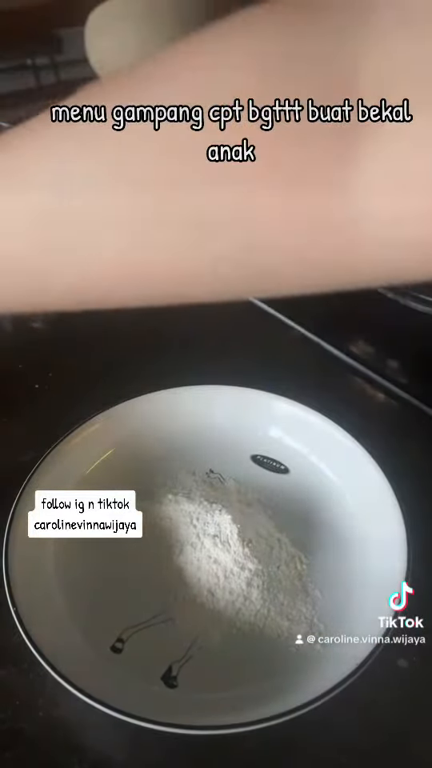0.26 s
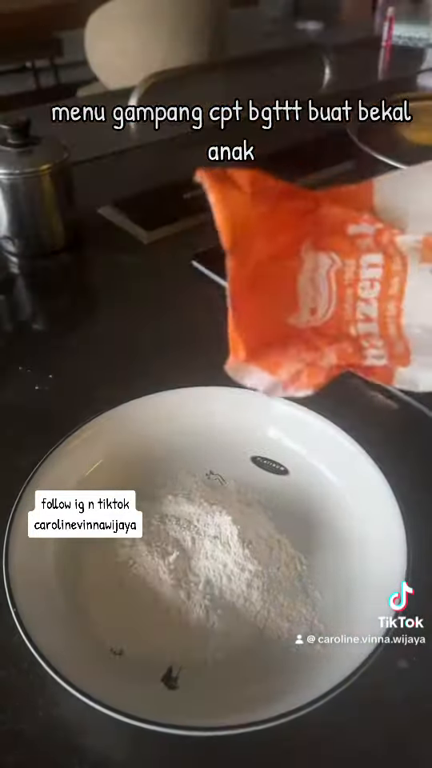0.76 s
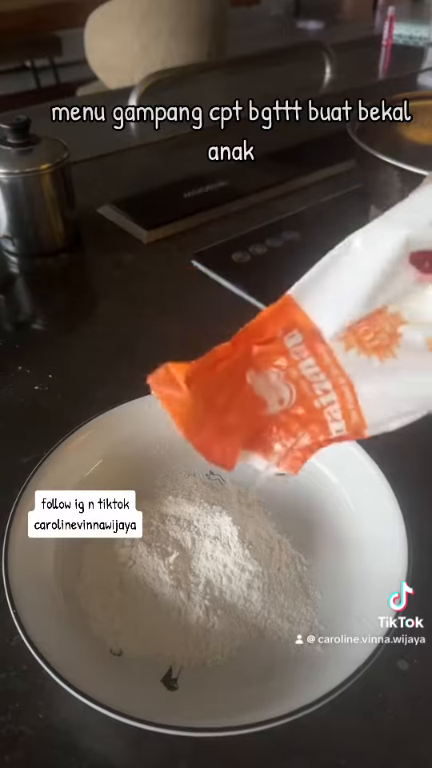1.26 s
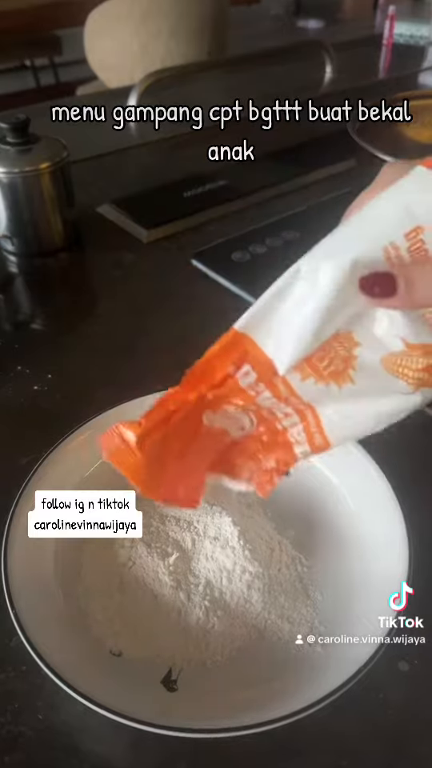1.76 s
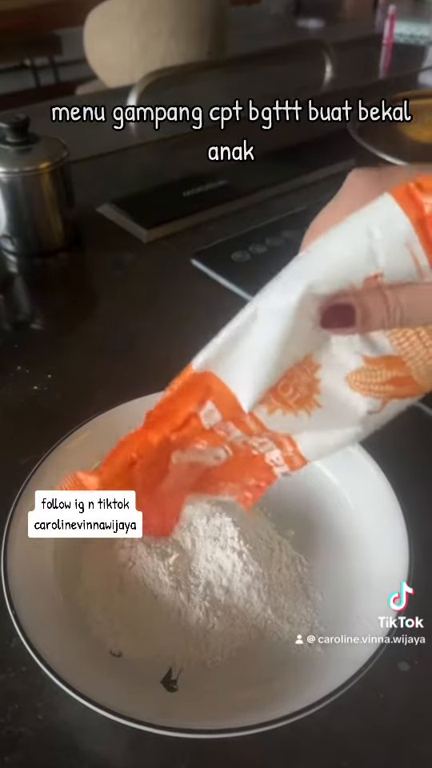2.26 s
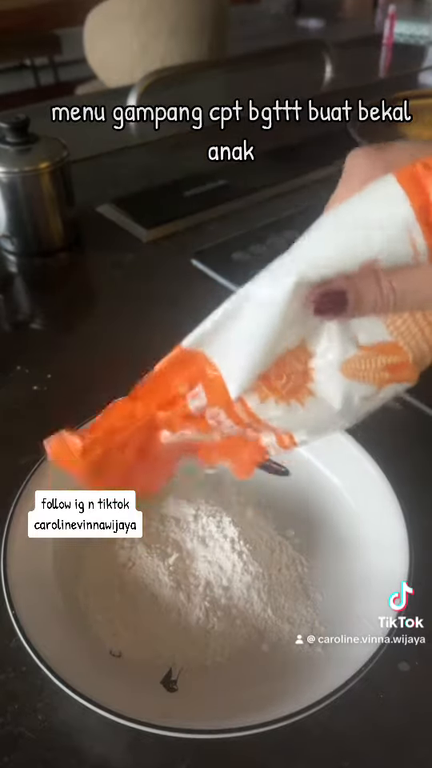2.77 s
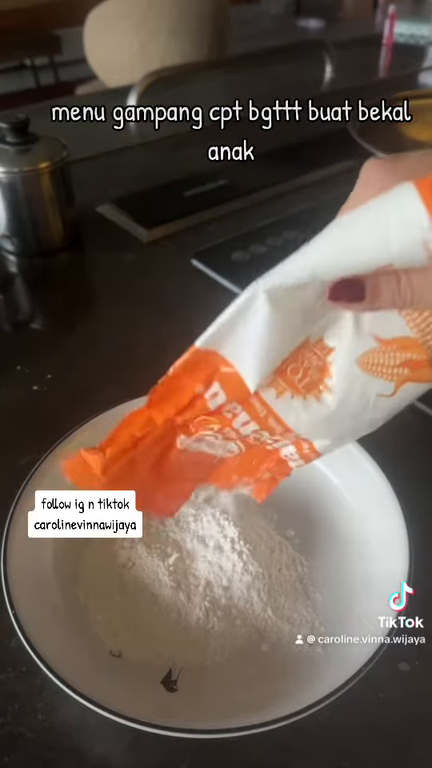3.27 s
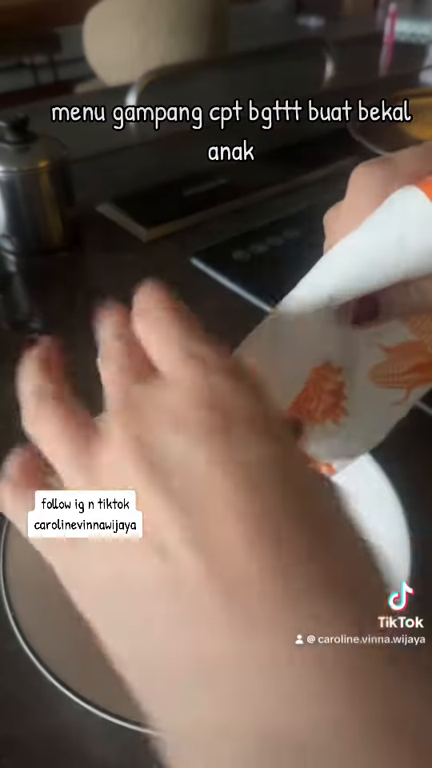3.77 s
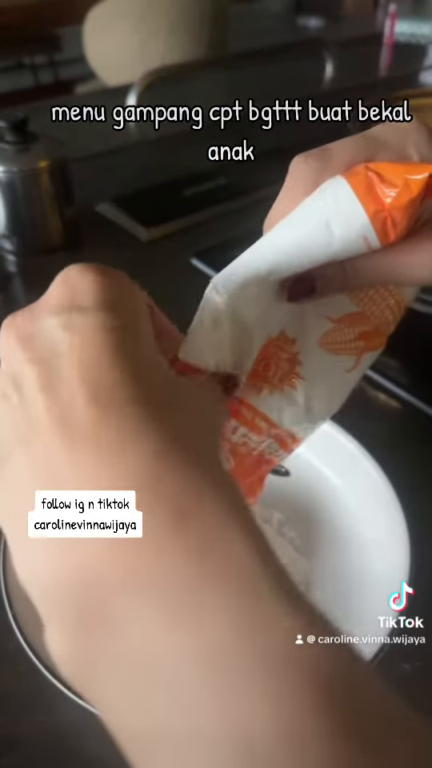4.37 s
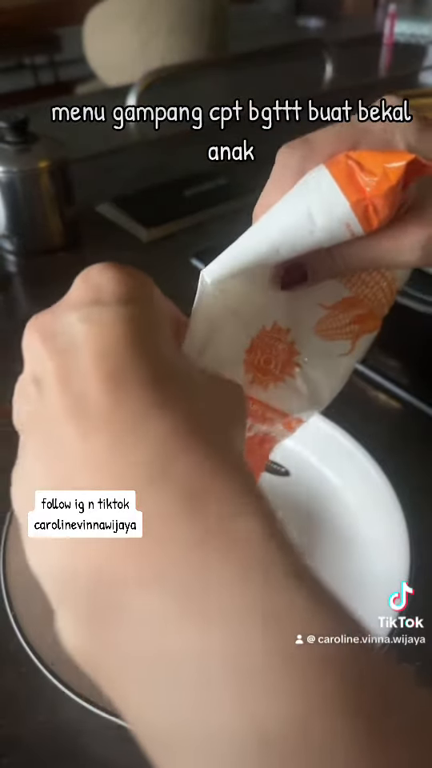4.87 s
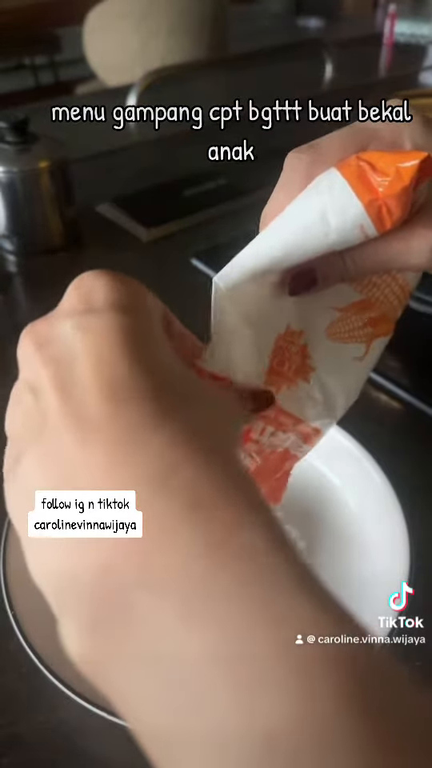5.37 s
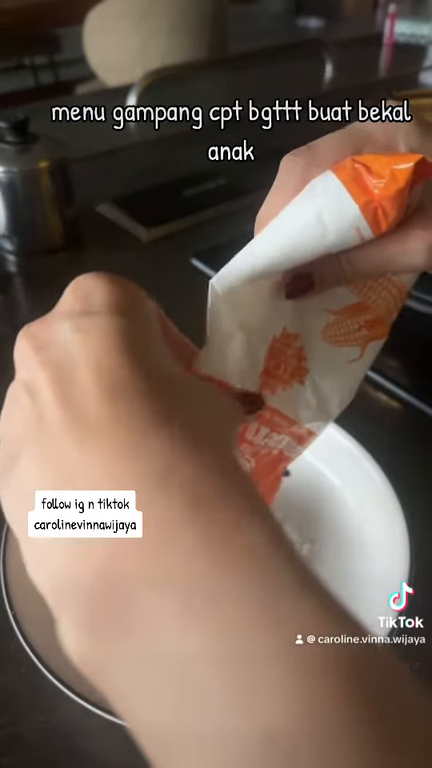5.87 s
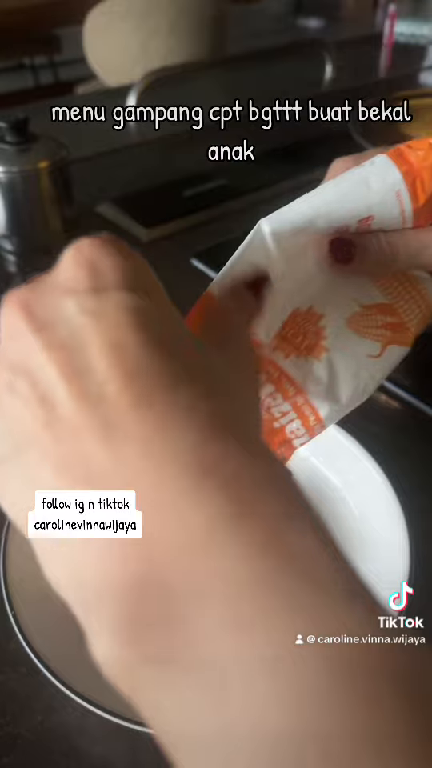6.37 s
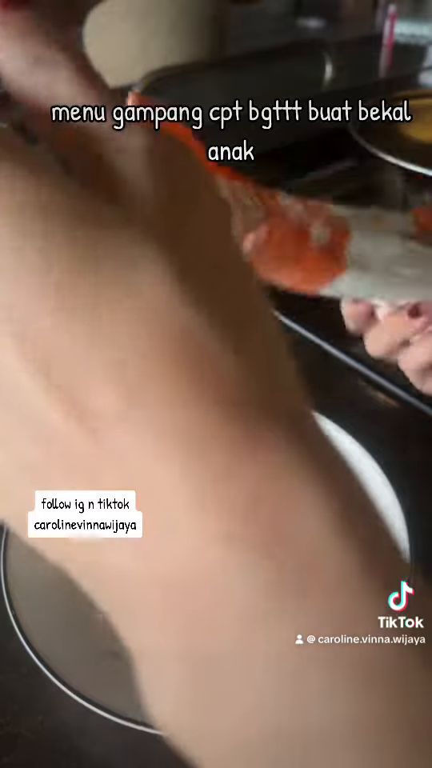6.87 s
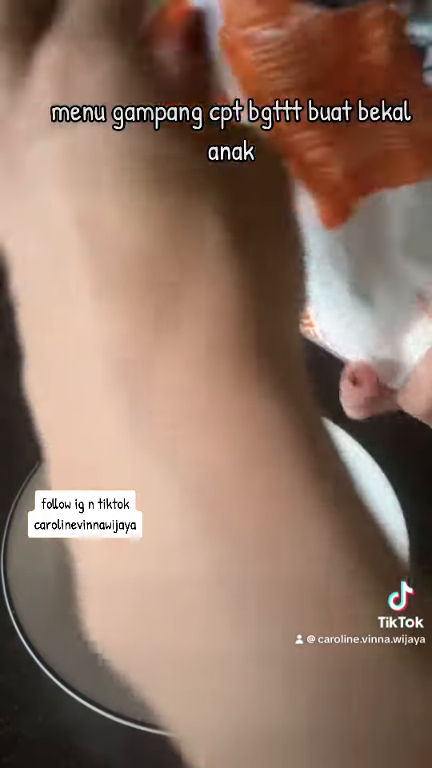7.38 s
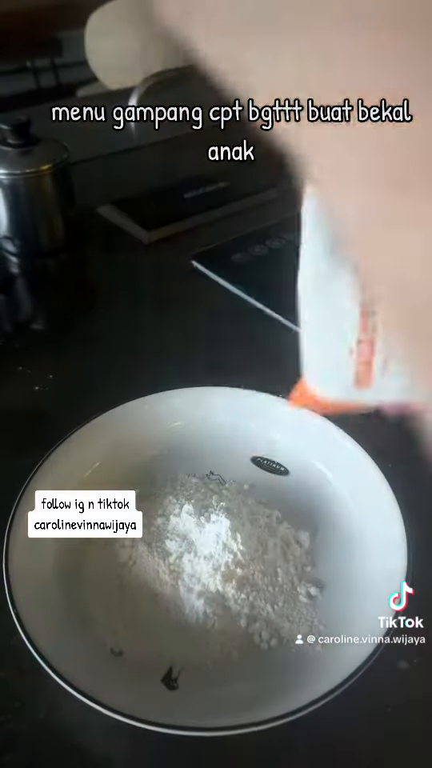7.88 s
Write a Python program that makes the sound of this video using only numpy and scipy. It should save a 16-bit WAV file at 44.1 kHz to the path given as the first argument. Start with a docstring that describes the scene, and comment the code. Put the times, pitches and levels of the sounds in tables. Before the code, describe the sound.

A plastic packet crinkles close to the microphone, and something soft drops on the counter with a low thud. The sound cuts out for an instant, then scattered creases snap as the packet is tipped. The crackling thickens into quick rustling shakes, with soft thumps of powder and small pops of air, before thinning as the packet is folded away. An appliance hums and whirs faintly in the slightly echoing kitchen.

```python
"""A packet of powder in a kitchen

A plastic packet crinkles in a hand, close to the microphone, between hard walls. Something soft drops on
the counter and the sound cuts out briefly. The packet is tipped, shaken, tapped and folded away: creases
buckle with snaps, crowds of tiny ones rustle, the powder thumps and trapped air pops.
An appliance hums and whirs behind."""
import sys
import numpy as np
from scipy import signal
from scipy.fft import rfft, irfft, next_fast_len
from scipy.io import wavfile

SR = 44100
rng = np.random.default_rng(int(sys.argv[2]) if len(sys.argv) > 2 else 0)


def master_out(mix):
    """Clip the mix to full scale and print it as 16-bit PCM to the path in sys.argv[1]."""
    frames = np.transpose(np.atleast_2d(mix))
    ceiling = np.clip(frames, -1, 1)
    pcm = np.round(ceiling * 32767).astype(np.int16)
    wavfile.write(sys.argv[1], SR, pcm)


N = 358533

# Whirring bands of the appliance: pitch_hz, width_hz, rms_db
WHIR_BANDS = [(55.2, 20, -72.5), (585, 130, -75.5), (1225, 80, -70), (5100, 300, -80), (7450, 350, -83)]
# Spectrum of the room's air: frequency_hz, relative_db
AIR_SPECTRUM = [(25, -45), (49, -9.5), (141, -11), (301, -18), (624, -24), (1260, -22), (2160, -29.5),
                (7510, -40.5), (12500, -39), (16000, -42)]
# The loudest creases: start_s, peak_db, pitch_hz, treble_db (rms relative to the peak of the snap's body)
CREASE_SNAPS = [(0.0177, -32, 2550, -30), (0.0402, -29, 4870, -24), (0.1507, -28.5, 2880, -20),
                (0.309, -29, 1410, -28.5), (0.858, -39.5, 1660, -20), (0.8804, -40, 2300, -11),
                (0.9493, -20.5, 7540, -11.5), (1.0098, -35, 3130, -24), (1.1207, -44.5, 2960, -34),
                (1.1364, -39, 1330, -34), (1.148, -26.5, 2340, -17), (1.266, -37.5, 1980, -21.5),
                (1.4243, -33, 5370, -13), (1.592, -27.5, 3020, -20.5), (1.677, -30.5, 2640, -37),
                (1.7037, -20.5, 1770, -9.5), (1.775, -38.5, 4950, -16), (1.911, -36, 1480, -18),
                (1.928, -36, 2500, -24), (2.014, -35.5, 3050, -14), (2.0556, -37, 1680, -28),
                (2.1319, -31, 9900, -24), (2.1548, -27.5, 2660, -13.5), (2.3949, -35.5, 1710, -25),
                (2.4203, -42, 2440, -21), (2.532, -40.5, 2700, -26), (2.5891, -36, 1810, -22),
                (2.6002, -29.5, 5300, -19.5), (2.7337, -41.5, 2250, -19.5), (2.7832, -24.5, 4060, -8.5),
                (2.831, -28, 9100, -20.5), (3.03, -31, 3020, -10), (3.0368, -33.5, 4700, -17),
                (3.2378, -35.5, 2930, -23), (3.274, -40, 2900, -7), (3.4922, -30, 1430, -29),
                (3.8834, -34, 1930, -30), (3.949, -26, 8200, -19), (4.115, -24, 8880, -1),
                (4.12, -22.5, 8000, 13), (4.1924, -30, 2760, -33), (4.208, -31, 8200, -18),
                (4.216, -34, 1670, -16), (4.244, -34, 1250, -27), (4.3482, -30.5, 9400, -3),
                (4.4924, -27.5, 4800, -30), (4.502, -20, 5700, -11), (4.5305, -17.5, 4200, -12),
                (4.659, -23, 4460, -5), (4.6693, -18, 4670, -11), (4.7096, -25.5, 3400, -12),
                (4.8053, -27.5, 3160, -18), (4.8763, -17.5, 2350, -9.5), (5.0075, -26, 2800, -10),
                (5.0832, -23, 5100, -9), (5.1973, -20.5, 9600, 3), (5.2245, -26.5, 3050, -22),
                (5.3358, -27, 2780, -9), (5.3552, -25, 4720, -9), (5.3735, -26, 5650, 0),
                (5.3835, -25, 4240, -7), (5.4012, -31, 1400, -31), (5.451, -29.5, 3200, -10),
                (5.4622, -24, 3030, -6), (5.489, -23, 5100, -15), (5.52, -31, 4200, -16),
                (5.6172, -30, 5870, -23), (5.6259, -31.5, 1560, -19), (5.6392, -23, 9000, -16),
                (5.7212, -30, 7160, -2), (5.7749, -21, 4400, -17.5), (5.784, -29, 4780, -13),
                (5.8718, -28, 4900, -4), (5.897, -21, 1310, -9), (6, -37, 6500, 0),
                (6.0073, -21, 5500, -19.5), (6.0267, -23, 1960, -35), (6.1872, -28.5, 6400, -32),
                (6.1918, -33, 3000, -20), (6.225, -32.5, 5830, -15), (6.2685, -28.5, 5800, -23),
                (6.308, -32, 1800, -43), (6.543, -36.5, 1500, -43), (7.0815, -34.5, 2530, -19),
                (7.1102, -36, 800, -25), (7.1248, -29.5, 2120, -7), (7.159, -31.5, 3370, -19),
                (7.2194, -38.5, 1750, -28), (7.4072, -26, 6200, -10), (7.5114, -30, 5430, -25),
                (7.622, -31, 1580, -33), (7.6546, -34, 1580, -29), (7.6699, -25.5, 5700, -14),
                (7.6907, -31, 1280, -31), (7.7097, -29.5, 8740, -17), (7.7305, -35, 2860, -19),
                (7.7526, -32, 3700, -14), (7.7681, -34, 2060, -16), (7.9099, -35, 1560, -32)]
# Envelope of the drop's crunch: time_s, level_db
CRUNCH_ENVELOPE = [(.083, -42), (.087, -37), (.098, -23.5), (.102, -36), (.116, -39), (.135, -49.5)]
# Spectrum of that crunch: frequency_hz, relative_db
CRUNCH_SPECTRUM = [(88, -28), (150, -4.5), (300, -11), (941, -15), (1980, -12), (3920, -22.5), (10400, -26),
                   (16000, -33)]
# Shakes and squeezes of the packet: crest_s, level_db, length_s
SHAKE_SWELLS = [(1.029, -54.5, 0.025), (1.666, -65, 0.14), (2.138, -57, 0.044), (2.822, -59, 0.12),
                (3.945, -53, 0.055), (4.144, -48, 0.043), (4.204, -45.5, 0.051), (4.432, -52, 0.088),
                (4.503, -47, 0.067), (4.666, -42.5, 0.063), (4.865, -39.5, 0.062), (5.036, -47, 0.054),
                (5.094, -46.5, 0.04), (5.203, -47.5, 0.057), (5.35, -44.5, 0.053), (5.484, -43, 0.049),
                (5.622, -38, 0.038), (5.75, -43.5, 0.049), (5.883, -46, 0.059), (6.004, -44, 0.049),
                (6.151, -51, 0.085), (6.278, -50, 0.038), (6.886, -60.5, 0.053), (7.141, -52, 0.06),
                (7.535, -56.5, 0.02), (7.687, -56.5, 0.2), (7.917, -51, 0.024)]
# Weighting of the film's resonances: frequency_hz, relative_db
RUSTLE_SPECTRUM = [(350, -37), (600, 11), (2010, 13), (3830, 2), (4910, 5), (11700, -2.5), (15100, 5),
                   (16000, -12)]
# Pushes on the air pocket in the packet: start_s, peak_db
POCKET_PUSHES = [(2.782, -43), (3.949, -42.5), (4.162, -39), (4.496, -47), (4.855, -49), (4.88, -38),
                 (5.212, -41), (5.327, -45), (5.362, -40), (5.491, -35), (5.62, -39.5), (5.756, -38),
                 (6.004, -39), (6.025, -38), (6.27, -43), (7.081, -47.5), (7.125, -39.5), (7.458, -47.5),
                 (7.67, -41.5), (7.915, -44.5)]
# Early reflections from near walls: delay_s, gain_db
WALL_ECHOES = [(.0095, -22), (.016, -23)]
# Reverberation time of the kitchen: frequency_hz, t60_s
REVERB_TIMES = [(150, 0.86), (1000, 1), (4000, 0.83), (16000, 0.85)]

SILENT_FROM_S, SILENT_UNTIL_S = .648, .762


def from_db(db):
    """Amplitude ratio of a level in decibels."""
    return 10 ** (np.asarray(db) / 20)


def rms_one(x):
    """Normalisation to unit power."""
    return x / np.sqrt(np.mean(x ** 2) + 1e-20)


def peak_one(x):
    """Normalisation of each row to unit peak."""
    return x / np.abs(x).max(axis=-1, keepdims=True)


def at_hz(points, hz):
    """Interpolation along a logarithmic frequency axis."""
    frequencies, values = np.transpose(points)
    return np.interp(np.log(hz), np.log(frequencies), values)


def drift(rate_hz):
    """Slow random modulation: low-passed noise of unit rms, computed at every 40th sample."""
    r = np.exp(-80 * np.pi * rate_hz / SR)
    slow = signal.lfilter([1], [1, -2 * r, r * r], rng.standard_normal(N // 40 + 2002))[2000:]
    return np.interp(np.arange(N) / 40, np.arange(len(slow)), rms_one(slow))


def resonance(x, hz, width_hz, stages=1):
    """Damped two-pole resonators in series, each of unit peak gain and the given bandwidth."""
    r = np.exp(-np.pi * width_hz / SR)
    gain = (1 - r * r) / 2
    for _ in range(stages):
        x = signal.lfilter([gain, 0, -gain], [1, -2 * r * np.cos(2 * np.pi * hz / SR), r * r], x)
    return x


def coloured(spectrum):
    """Spectral shaping of white noise, at unit rms."""
    size = next_fast_len(N)
    hz = np.maximum(np.fft.rfftfreq(size, 1 / SR), 1)
    shaped = rfft(rng.standard_normal(size)) * from_db(at_hz(spectrum, hz))
    return rms_one(irfft(shaped, size)[:N])


def appliance(hum_hz=137.3, hum_peak_db=-60, air_db=-63.5):
    """Periodic motor vibration gives a wavering hum, heard with narrow-band whir and broadband room air."""
    phase = 2 * np.pi * np.cumsum(hum_hz + .5 * drift(2.1)) / SR
    hum = np.sin(phase) * from_db(hum_peak_db + 0.46 * drift(14))
    whir = sum(from_db(db + drift(18)) * rms_one(resonance(rng.standard_normal(N), hz, width, stages=2))
               for hz, width, db in WHIR_BANDS)
    air = from_db(air_db + 1.6 * drift(3.6)) * coloured(AIR_SPECTRUM)
    return hum + whir + air


def crease_snaps(rise_s=0.00028, ring_s=0.0022, relative_width=0.56, room_db=-0.5):
    """Buckling: a crease flips and rings its patch of film. Returns direct sound and the room's share."""
    out, t = np.zeros((2, N + 512)), np.arange(512) / SR
    mid_band = signal.butter(3, [1250, 6800], "band", fs=SR, output="sos")
    top_band = signal.butter(1, [6500, 12000], "band", fs=SR, output="sos")
    flip = t / rise_s * np.exp(1 - t / rise_s)
    ring = np.minimum(t / rise_s, 1) * np.exp(-t / ring_s)
    for start_s, peak_db, hz, treble_db in CREASE_SNAPS:
        ring_db = -7.5 + 0.56 * (peak_db + 40)   # louder snaps ring on more strongly
        bass_db = min(-21 - 1.05 * treble_db, 0)   # brighter snaps have less low body
        envelope = flip + from_db(ring_db) * ring
        # Row 0 reaches the microphone; row 1 is the mean over all directions, where fine colour evens out.
        burst = np.array([envelope * rng.standard_normal(512), t == 0])
        patch = peak_one(resonance(burst, hz, hz * relative_width, stages=2))
        mids = from_db(0.5) * peak_one(signal.sosfilt(mid_band, burst))
        treble = peak_one(signal.sosfilt(top_band, burst))
        treble = from_db(treble_db) * treble / np.std(treble[0, :220])   # rms over the first 5 ms
        bass = from_db(bass_db) * peak_one(resonance(burst, 470, 1700))
        body = peak_one(patch + mids + bass)
        direct = from_db(peak_db) * peak_one(body + treble)[0]
        around = rms_one((patch / 2 + mids + 2 * treble + bass)[1]) * np.std(direct) * from_db(room_db)
        at = round(start_s * SR)
        out[:, at:at + 512] += [direct, around]
    return out[:, :N]


def drop_crunch():
    """Inelastic impact: the soft load settles with a short burst of noise."""
    t = np.arange(N) / SR
    times_s, levels_db = np.transpose(CRUNCH_ENVELOPE)
    settling = (t > times_s[0]) & (t < times_s[-1])
    return settling * from_db(np.interp(t, times_s, levels_db)) * coloured(CRUNCH_SPECTRUM)


def counter_thud(start_s=0.097, level_db=-35, final_hz=56.5, t60_s=0.21, rise_s=0.0075):
    """Damped vibration: the counter answers the drop with a low tone that sinks quickly in pitch."""
    age = np.maximum(np.arange(N) / SR - start_s, 0)
    cycles = final_hz * (age + 0.0462 * (1 - np.exp(-age / 0.0051)))
    envelope = from_db(level_db - 60 * age / t60_s) * np.minimum(age / rise_s, 1)
    return envelope * np.sin(2 * np.pi * cycles)


def shake_powers(held_db=-86, rise_share=0.49):
    """Incoherent sources add in power: each shake adds a swell to the film's and the powder's envelope."""
    t = np.arange(N) / SR
    film_power, powder_power = np.full(N, from_db(2 * held_db)), np.zeros(N)
    for crest_s, film_db, length_s in SHAKE_SWELLS:
        span = slice(round(crest_s * SR) - SR // 3, round(crest_s * SR) + SR // 3)
        offset_s = t[span] - crest_s
        flank_s = length_s * np.where(offset_s < 0, rise_share, 1 - rise_share)
        swell = np.exp(-np.log(4) * (offset_s / flank_s) ** 2)
        powder_db = -55 + 0.49 * (film_db + 50)   # the powder lands harder in a stronger shake
        film_power[span] += from_db(2 * film_db) * swell
        powder_power[span] += from_db(2 * powder_db) * swell ** 3   # briefer than the rustle
    return film_power, powder_power


def film_rustle(power, flips_per_s=4000, spread_db=3.4, clump_db=5, burst_s=0.0006, q=3):
    """Superposition: many tiny creases flip at random, each ringing the film for a few cycles."""
    effort = power / power.max()
    sizes = from_db(spread_db * np.minimum(rng.exponential(1, N), 2.5))
    busy = effort ** .15   # gentle handling flips fewer creases, each heard alone
    flipped = rng.random(N) < busy * flips_per_s * from_db(clump_db * drift(60)) / SR
    flips = flipped * sizes / np.sqrt(busy)
    band_of_flip, noise = rng.integers(0, 24, N), rng.standard_normal(N)
    film = 0
    for band, hz in enumerate(np.geomspace(600, 15500, num=24)):
        kicks = flips * (band_of_flip == band) + 1e-18
        envelope = signal.lfilter([1], [1, -np.exp(-1 / (burst_s * SR))], kicks)
        film += from_db(at_hz(RUSTLE_SPECTRUM, hz)) * hz * resonance(noise * envelope, hz, hz / q)
    dull = signal.lfilter(*signal.butter(1, 2500, fs=SR), film)
    film = dull + effort ** 0.13 * (film - dull)   # the treble opens with force
    begun = np.arange(N) / SR > SILENT_FROM_S
    return np.sqrt(power) * rms_one(film) * begun


def powder_thumps(power, bag_hz=223, width_hz=485):
    """Cavity resonance: powder lands in uneven lumps and excites the hollow of the bag."""
    lumps = from_db(5.5 * drift(45)) * rng.standard_normal(N)
    return np.sqrt(power) * rms_one(resonance(lumps, bag_hz, width_hz, stages=2))


def pocket_pops(pocket_hz=350, width_hz=293, grip_octaves=.25):
    """Impulse response: a push rings the air pocket for a cycle or two; its pitch varies with the grip."""
    out, push = np.zeros(N), np.arange(1024) == 0
    for start_s, peak_db in POCKET_PUSHES:
        hz = pocket_hz * 2 ** rng.uniform(-grip_octaves, grip_octaves)
        pop = peak_one(resonance(push, hz, width_hz, stages=2))
        out[round(start_s * SR):][:1024] += from_db(peak_db) * pop
    return out


def kitchen(x, tail_db=-11.5):
    """Reverberation: early wall reflections, then a diffuse tail decaying exponentially in each band."""
    t, edges_hz = np.arange(SR) / SR, 100 * 2 ** np.arange(0, 7.6, .5)
    tail = 0
    for low, high in zip(edges_hz, edges_hz[1:]):
        band_pass = signal.butter(2, [low, high], "band", fs=SR, output="sos")
        band = signal.sosfilt(band_pass, rng.standard_normal(SR))
        dull_db = -1.5 * np.log2(1 + low / 3000)   # walls and air absorb treble first
        tail += band * from_db(dull_db - 60 * t / at_hz(REVERB_TIMES, np.sqrt(low * high)))
    tail *= np.clip((t - .008) / 0.00093, 0, 1)   # the tail sets in after 8 ms
    response = from_db(tail_db) * tail / np.sqrt(np.sum(tail ** 2))
    for delay_s, gain_db in WALL_ECHOES:
        smear = rng.standard_normal(100) / 10   # rough walls scatter the echo
        response[round(delay_s * SR):][:100] += from_db(gain_db) * smear
    return signal.fftconvolve(x, response)[:N]


def scene():
    """Direct and reverberant sound add at one microphone, over the appliance."""
    snaps, snaps_around = crease_snaps()
    film_power, powder_power = shake_powers()
    handling = film_rustle(film_power) + powder_thumps(powder_power) + drop_crunch() + pocket_pops()
    return (snaps + handling + counter_thud() + kitchen(snaps_around + handling) + appliance())[None]


def record(dry, bass_cut_hz=48, top_cut_hz=16700):
    """Band limiting and gating: deep bass and top are lost; the sound cuts out briefly and fades back."""
    t = np.arange(N) / SR
    closing, opening = (SILENT_FROM_S - t) / .002, (t - SILENT_UNTIL_S) / .012
    gate = np.clip(np.maximum(closing, opening), 0, 1) ** 2
    thin = signal.sosfilt(signal.butter(4, bass_cut_hz, "high", fs=SR, output="sos"), dry)
    thin = thin - 0.71 * resonance(thin, 12030, 4400)   # a dip in the microphone's treble
    return signal.sosfilt(signal.cheby2(18, 70, top_cut_hz, fs=SR, output="sos"), thin * gate)


dry = scene()
out = record(dry)
master_out(out)
```